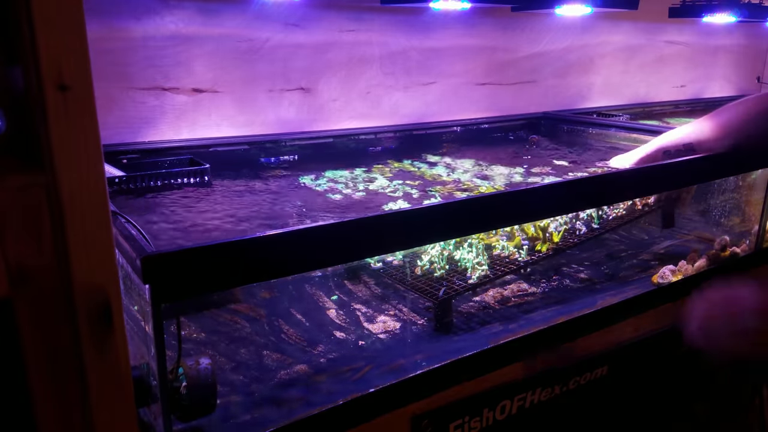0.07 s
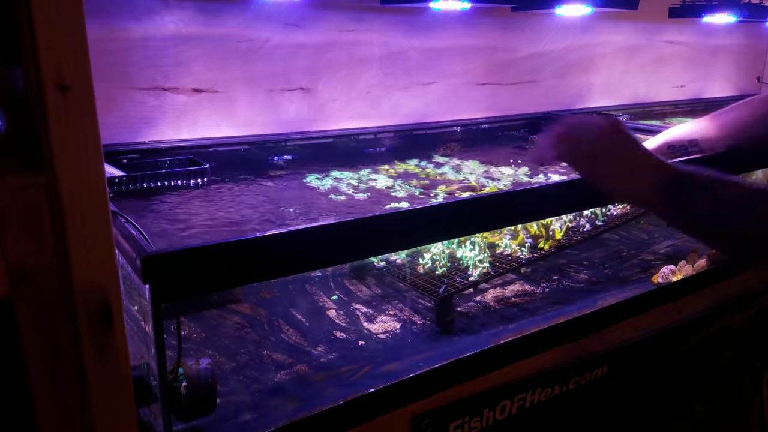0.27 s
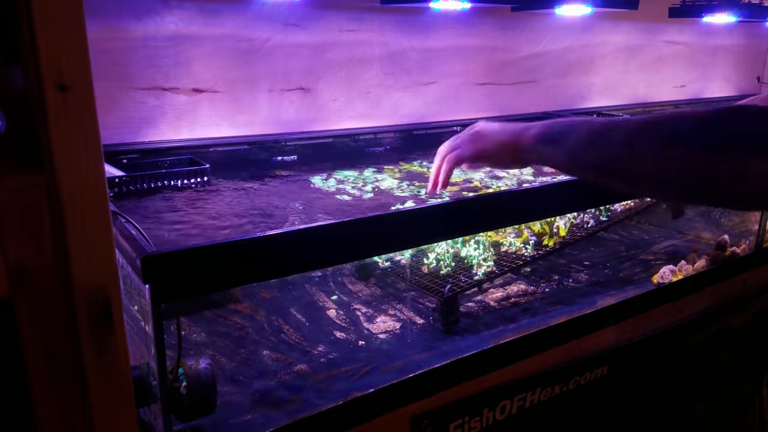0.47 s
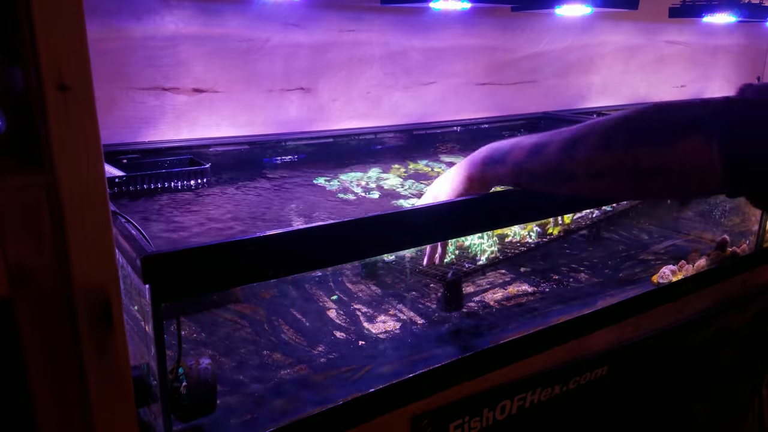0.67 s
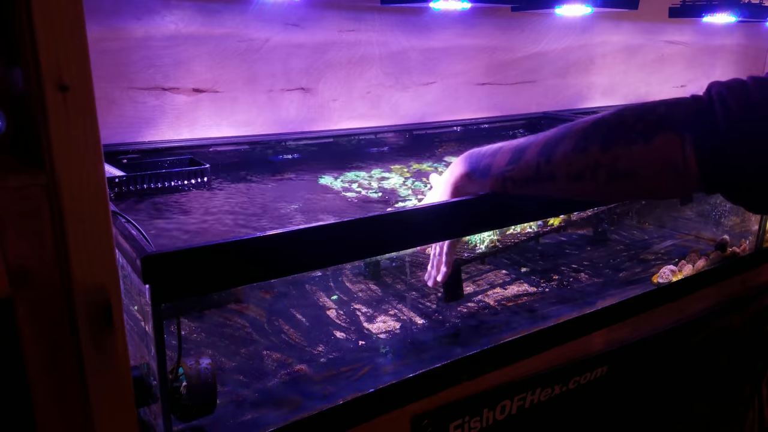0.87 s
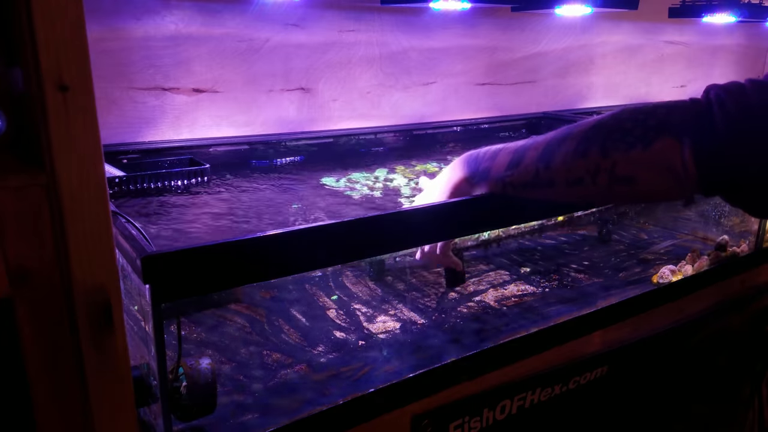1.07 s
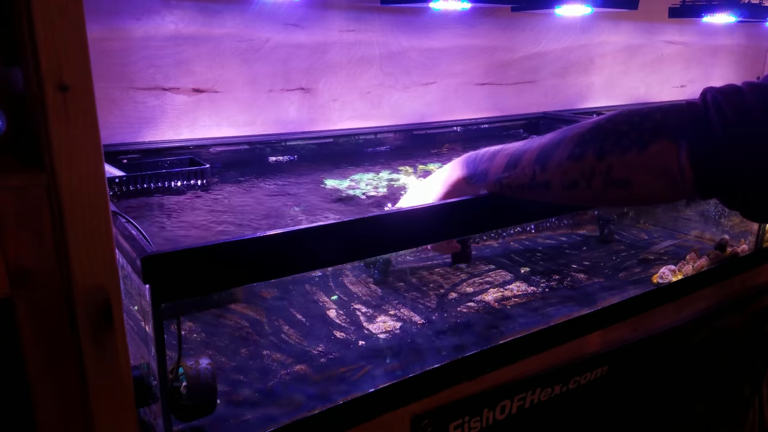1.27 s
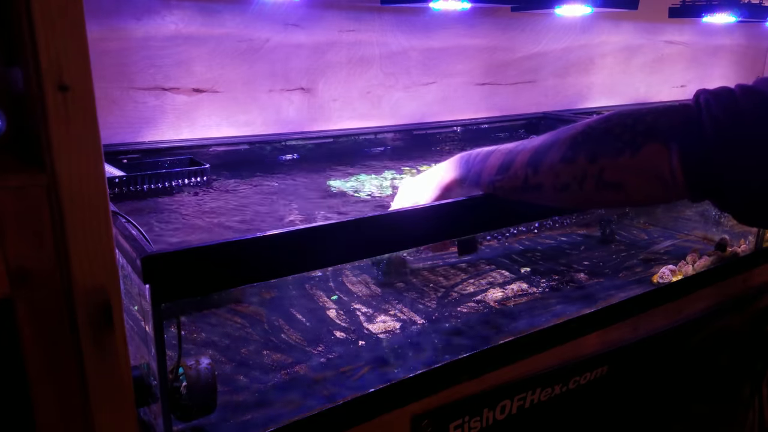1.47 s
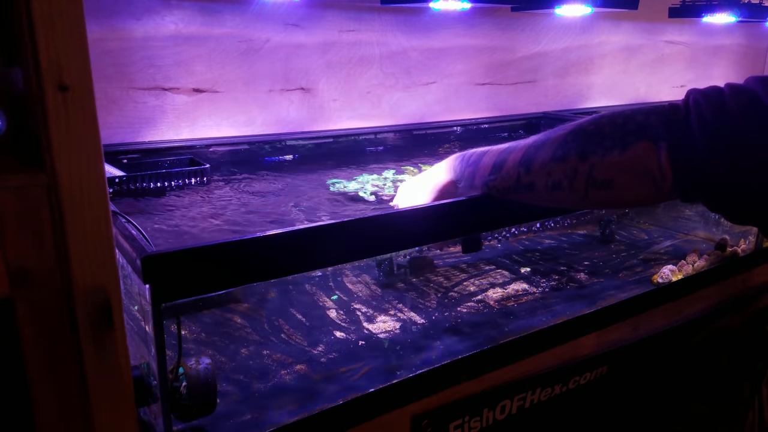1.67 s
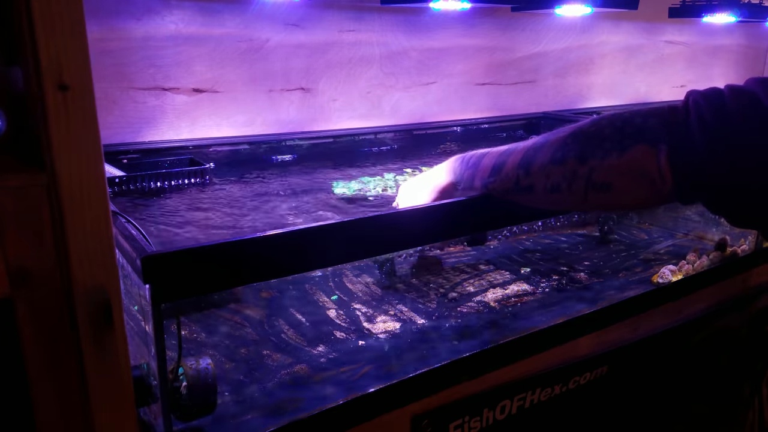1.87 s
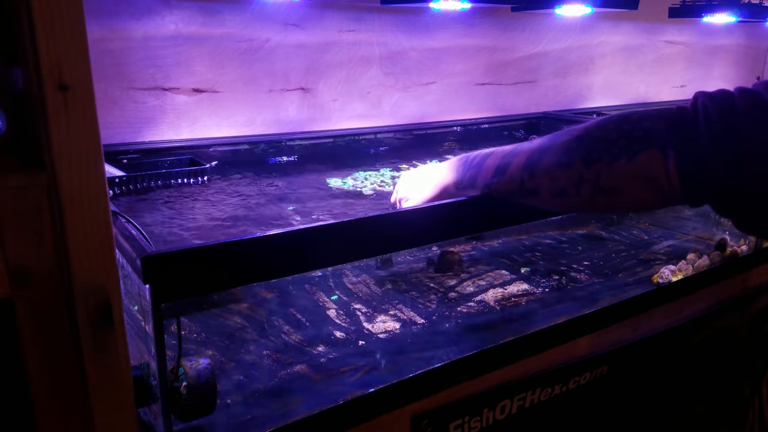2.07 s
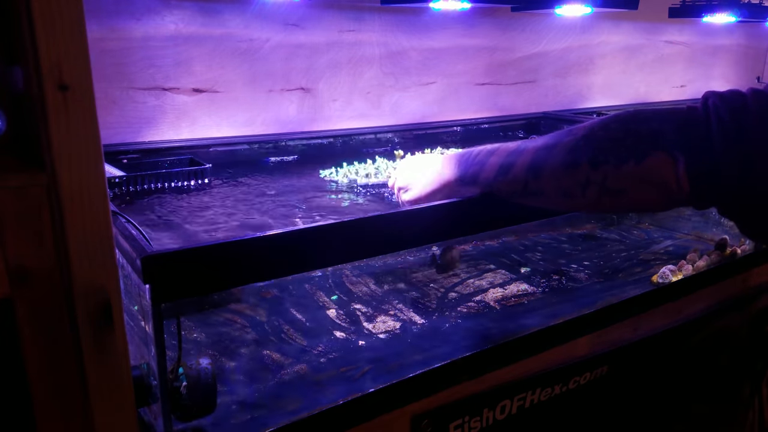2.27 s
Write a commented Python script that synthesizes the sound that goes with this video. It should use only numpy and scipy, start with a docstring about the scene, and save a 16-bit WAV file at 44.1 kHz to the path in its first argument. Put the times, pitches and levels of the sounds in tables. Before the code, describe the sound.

Aquarium pumps hum and rumble steadily in a small room, over rushing, trickling water and a fine hiss. A hand moving in the nearby tank makes soft slops, and a few drops plink throughout.

```python
"""A small room with a long shallow tank, pumps and fans running all around it. Mains hum, two swelling drones
and a thin motor whine sit on a rumble that rings the stand and the room. Water rushes and trickles under a fine
high hiss; a hand moving in the tank makes soft slops, a soft knock rings out early on and a few drops plink,
each a ringing bubble. The bed of rush, rumble and hum slowly grows louder."""
import sys
import numpy as np
from scipy import signal
from scipy.fft import rfft, irfft, next_fast_len
from scipy.io import wavfile
from scipy.ndimage import uniform_filter1d

SR = 44100
rng = np.random.default_rng(int(sys.argv[2]) if len(sys.argv) > 2 else 0)


def unload_audio(sound):
    """Save the sound as a 16-bit wav file, at the path given as the first command line argument."""
    columns = np.transpose(np.atleast_2d(sound))
    # keep every value between -1 and 1, then stretch to whole-number steps
    steps = np.round(np.clip(columns, -1, 1) * 32767)
    wavfile.write(sys.argv[1], SR, steps.astype(np.int16))


N = 102841
T = np.arange(N) / SR
FFT_SIZE = next_fast_len(N)
F = np.maximum(np.arange(FFT_SIZE // 2 + 1) * SR / FFT_SIZE, 1)

# Fader ride on the bed of rumble, hum and rush: t/s, level/dB
BED_LEVEL = [(0.0, -35.5), (0.02, -39), (1.3, -37), (1.44, -37), (1.47, -36), (2.32, -36), (2.33, -40)]
# Resonances of stand and room: f/Hz, width/Hz, level/dB re the bed
RESONANCES = [(107.9, 10, -13), (145.6, 4.4, -24.5), (171, 38, -17), (207, 47, -18), (270.4, 31, -9.5),
              (323.3, 14, -16.5), (431, 46, -14), (664, 35, -27), (765, 47, -19), (1119.3, 19, -20),
              (1248, 126, -19)]
# Mains hum and motor tones: f/Hz, level/dB re the bed, waver/dB, pan/dB (always left minus right)
HUM_TONES = [(60, -15.5, .7, -1), (120, -11, 2.0, -1), (240, -18, 2.5, -1.5), (300, -15, 2.5, -2),
             (480, -25, 2.5, -2), (970, -28, 2.0, -2), (3854, -42, 2.0, -2)]
# Swells of the upper drone: t/s, level/dB
UPPER_DRONE_LEVEL = [(0, -53), (1.44, -53), (1.5, -41.5), (1.71, -41.5), (1.78, -52), (1.88, -46),
                     (2.0, -52), (2.15, -47), (2.33, -49)]
# Swells of the lower drone: t/s, level/dB
LOWER_DRONE_LEVEL = [(0, -51), (.18, -52), (.25, -40), (.38, -43.5), (.46, -52), (.62, -58), (.69, -40),
                     (.8, -47), (1.05, -53), (1.15, -46.5), (1.32, -42), (1.42, -49), (1.62, -45),
                     (1.75, -52.5), (2.0, -41.5), (2.33, -50)]
# Ride on the motor whine: t/s, level/dB
WHINE_LEVEL = [(0, -69), (.38, -70.5), (.6, -66.5), (.76, -63.5), (1.0, -66), (1.6, -65.5), (1.75, -69.5),
               (2.33, -70.5)]
# EQ of the rush: f/Hz, relative level/dB
RUSH_EQ = [(25, -26), (40, -18), (52, -18.5), (78, -19), (100, -13.5), (150, -11), (330, -12), (500, -15.5),
           (1250, -23), (1500, -27), (3000, -32), (3500, -36), (7500, -48), (9200, -55.5), (11000, -48.5),
           (15500, -53)]
# Ride on the treble of the rush, taken about its mean: t/s, level/dB
RUSH_TREBLE = [(0.0, -63), (0.34, -62.5), (0.6, -64), (1.0, -63), (1.17, -63), (1.47, -59.5), (2.33, -61)]
# Ringing plinks: a soft knock (the two rows at .169 s), then drops: t/s, level/dB, f/Hz, decay/cycles, pan/dB
PLINKS = [(.169, -31.5, 1100, 24, -4), (.169, -39, 2500, 32, 2), (.18, -43, 2900, 40, 4),
          (.215, -35, 470, 16, -2), (.24, -38.5, 960, 50, -4), (.522, -46, 3850, 45, 0),
          (.538, -35, 690, 16, 0), (.854, -29.5, 440, 13, -2), (1.05, -34, 520, 13, -2),
          (1.233, -38, 1130, 16, 2), (1.457, -46, 2050, 25, 2), (1.783, -37.5, 2330, 30, -2),
          (1.795, -39, 2440, 36, -5), (1.828, -41, 2350, 20, -4), (2.155, -52, 7300, 40, 4),
          (2.23, -44, 2000, 25, -3), (2.305, -33, 440, 14, -2), (2.31, -36, 760, 20, -2)]
# Slops against the hand: t/s, level/dB, decay/s
HAND_SLOPS = [(0.127, -49, 0.14), (0.172, -45, 0.009), (0.375, -55, 0.037), (0.522, -51.5, 0.0097),
              (0.622, -71, 0.018), (1.014, -70, .02), (1.446, -49, .03), (1.222, -48, 0.034),
              (1.794, -53, 0.018), (2.075, -53, 0.037)]
# EQ of the slops: f/Hz, relative level/dB
SLOP_EQ = [(500, -17), (1100, 8), (2500, 1.5), (6000, -10.5), (14000, -30)]
# Ride on the high hiss: t/s, level/dB
HISS_LEVEL = [(0.0, -65), (0.08, -64), (0.12, -56.5), (0.28, -64.5), (0.37, -65), (0.6, -70), (0.69, -63),
              (0.89, -70), (0.92, -58), (0.98, -66), (1.13, -63.5), (1.3, -64.5), (1.62, -58.5),
              (1.68, -63), (1.8, -61.5), (1.99, -66), (2.04, -58), (2.33, -64)]
# EQ of the high hiss: f/Hz, relative level/dB
HISS_EQ = [(8500, -25), (9800, -12), (11500, -4.5), (13000, 0.5), (14300, -3), (15500, -6)]
# Stereo image of the noise: f/Hz, left-right correlation (0 wide, 1 mono)
NOISE_CORRELATION = [(25, 0.9), (60, 0.67), (130, 0.96), (290, 0.87), (640, 0.49), (1300, 0), (15000, 0.06)]
# Stereo balance of the noise: f/Hz, pan/dB
NOISE_PAN = [(30, 2), (60, -3), (110, -2.5), (200, -0.5), (380, -2.5), (700, -2.5), (1290, -3),
             (2380, -3.5), (4400, -3), (8120, 11), (15000, -1.5)]


def motors():
    """Pumps and fans: their rumble rings the stand and the room under a wavering hum."""
    rumble = sum(undb(db) * coloured_noise(1 / (1 + (2 * (F - hz) / width_hz) ** 2))
                 for hz, width_hz, db in RESONANCES)
    hum = sum(tone(hz, drift_hz=0.27, pan_db=pan_db) * undb(db + waver_db * wander(4.76))
              for hz, db, waver_db, pan_db in HUM_TONES)
    return (rumble + hum) * undb(curve(BED_LEVEL))


def motor_voices():
    """Two low motor drones swell separately and flutter together; a thin whine sits to the right."""
    upper = tone(hz=212, drift_hz=2.347, pan_db=-2.9) * undb(curve(UPPER_DRONE_LEVEL))
    lower = tone(hz=94.1, drift_hz=2.347, pan_db=-1.8) * undb(curve(LOWER_DRONE_LEVEL))
    whine = tone(hz=2929.7, drift_hz=.15, pan_db=-16) * undb(curve(WHINE_LEVEL) + 1.6 * wander(22))
    return (upper + lower) * undb(1.56 * wander(21.95)) + whine


def rush(trim_db=-2, swell_db=.6, flicker_db=1.3, crossover_hz=3000):
    """Rushing water and air: half-octave noise bands that swell together and flicker on their own."""
    spectrum = stereo_spectrum() * undb(over_hz(RUSH_EQ))
    swell = swell_db * wander(11.5)
    body = treble = 0
    for half_octave in np.arange(9, 29):  # centres from 23 Hz to 16 kHz
        window = np.cos(np.pi / 2 * np.clip(2 * np.log2(F) - half_octave, -1, 1)) ** 2
        band = to_time(spectrum * window) * undb(swell + flicker_db * wander(14.08))
        if 2 ** (half_octave / 2) > crossover_hz:
            treble = treble + band
        else:
            body = body + band
    bed_db = curve(BED_LEVEL)
    treble_db = curve(RUSH_TREBLE) - np.mean(curve(RUSH_TREBLE)) + np.mean(bed_db)
    return undb(trim_db) / rms(body) * (body * undb(bed_db) + treble * undb(treble_db))


def add_bubble(out, at, db, hz, cycles, pan_db, glide=.04):
    """Mix in one ringing plink: a sine that bends upward as it dies away."""
    start = int(at * SR)
    t = np.arange(min(int(2 * cycles / hz * SR), N - start)) / SR
    age = t * hz / cycles
    envelope = np.exp(-3 * age) * np.minimum(age * 8, 1)
    plink = np.sin(2 * np.pi * hz * t * (1 + glide * age)) * envelope
    out[:, start:start + len(t)] += panned(plink * undb(db), pan_db)


def drips(trickle_per_s=110, floor_db=-57, scatter_db=2.5, lowest_hz=700, octaves=3.4):
    """A soft knock and a few clear drops plink over a faint trickle of random little bubbles."""
    out = np.zeros((2, N))
    for plink in PLINKS:
        add_bubble(out, *plink)
    count = int(trickle_per_s * N / SR)
    for when, strength, pitch, side in rng.random(size=(400, 4))[:count]:
        db = floor_db - scatter_db * np.log(1 - strength)
        hz = lowest_hz * 2 ** (pitch * octaves)
        add_bubble(out, when * N / SR, db, hz, cycles=10, pan_db=12 * (side - .5))
    return out


def slops():
    """Water slops against the hand: soft noise bursts that rise three times faster than they fall."""
    envelope = sum(undb(db) * np.exp(-np.where(T < at, -3, 1) * (T - at) / decay_s)
                   for at, db, decay_s in HAND_SLOPS)
    return envelope * coloured_noise(undb(over_hz(SLOP_EQ)))


def high_hiss(low_cut_hz=5000, top_hz=13300, flicker_db=1.2, top_flicker_db=1.8, top_swing=.45):
    """A fine high hiss whose topmost band flickers and swells more than the rest."""
    spectrum = stereo_spectrum() * undb(over_hz(HISS_EQ)) * (F > low_cut_hz)
    ride_db = curve(HISS_LEVEL)
    body = to_time(spectrum * (F <= top_hz)) * undb(flicker_db * wander(23.2))
    top_db = top_flicker_db * wander(26.6) + top_swing * (ride_db - np.mean(ride_db))
    hiss = body + to_time(spectrum * (F > top_hz)) * undb(top_db)
    return hiss / rms(hiss) * undb(ride_db)


def small_room(x, rt60_s=.07, wet_db=-9):
    """Close walls add a short, diffuse tail."""
    t = T[:SR // 5]
    tail = rng.standard_normal((2, len(t))) * np.exp(-np.log(1000) * t / rt60_s)
    tail /= np.sqrt(np.sum(tail ** 2, axis=1, keepdims=True))
    return x + undb(wet_db) * signal.fftconvolve(x, tail, axes=1)[:, :N]


def tone(hz, drift_hz, pan_db):
    """A panned sine whose pitch drifts."""
    phase = 2 * np.pi * (np.cumsum(hz + drift_hz * wander(5.94)) / SR + rng.random())
    return panned(np.sqrt(2) * np.sin(phase), pan_db)


def stereo_spectrum():
    """Left and right noise spectra, narrow in the bass and wide in the treble."""
    mid, side = rfft(rng.standard_normal((2, FFT_SIZE)))
    correlation = np.clip(over_hz(NOISE_CORRELATION), 0, .99)
    mid, side = mid * np.sqrt(1 + correlation), side * np.sqrt(1 - correlation)
    lean = undb(over_hz(NOISE_PAN) / 2)
    return np.array([(mid + side) * lean, (mid - side) / lean])


def coloured_noise(gain):
    """Stereo noise through an EQ curve, rms 1."""
    noise = to_time(stereo_spectrum() * gain)
    return noise / rms(noise)


def wander(rate_hz):
    """Smooth random modulation with a spread of about 1."""
    hold = int(SR / rate_hz)
    steps = np.repeat(rng.standard_normal(N // hold + 1), hold)
    return 1.353 * uniform_filter1d(uniform_filter1d(steps, hold), hold)[:N]


def panned(x, pan_db):
    """Place a mono sound; positive is left."""
    return x * undb(np.array([[pan_db], [-pan_db]]) / 2)


def curve(table):
    """Breakpoints read over time."""
    return np.interp(T, *np.array(table).T)


def over_hz(table):
    """Breakpoints read over log frequency."""
    hz, values = np.array(table).T
    return np.interp(np.log(F), np.log(hz), values)


def to_time(spectrum):
    return irfft(spectrum, FFT_SIZE)[:, :N]


def undb(db):
    return 10 ** (np.asarray(db) / 20)


def rms(x):
    return np.sqrt(np.mean(x ** 2))


def scene():
    """The mix of machines, water and hiss; only the drips get the room tail."""
    return rush() + motors() + motor_voices() + high_hiss() + small_room(drips()) + slops()


def record(dry, high_cut_hz=15650, dc_offset=-0.0012):
    """Output stage: a steep high cut and a small DC offset."""
    lead = SR // 50  # a mirrored pre-roll lets the filter settle
    padded = np.pad(dry, ((0, 0), (lead, 0)), mode="reflect")
    high_cut = signal.ellip(16, .3, 80, high_cut_hz, fs=SR, output="sos")
    return signal.sosfilt(high_cut, padded)[:, lead:] + dc_offset


dry = scene()
out = record(dry)
unload_audio(out)
```